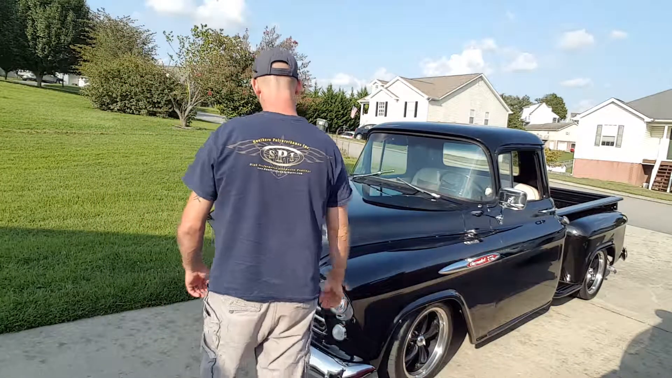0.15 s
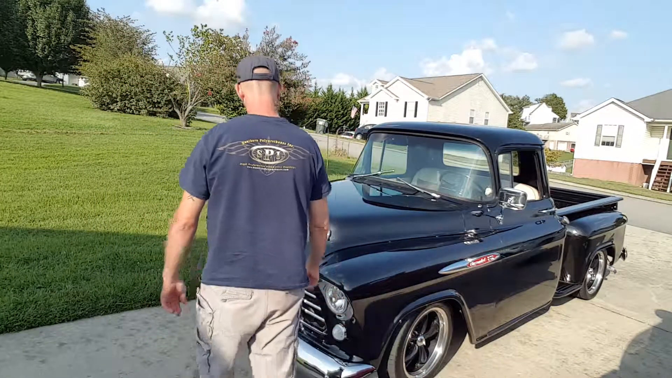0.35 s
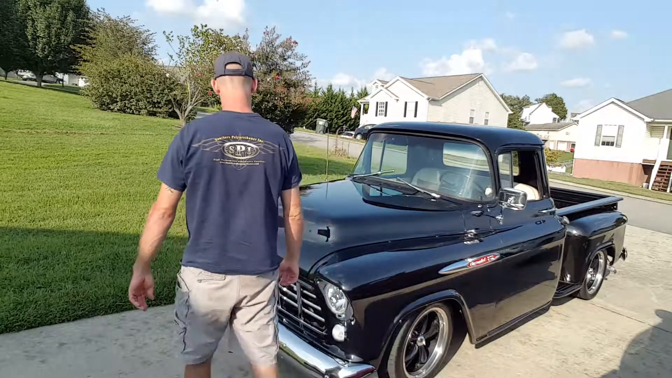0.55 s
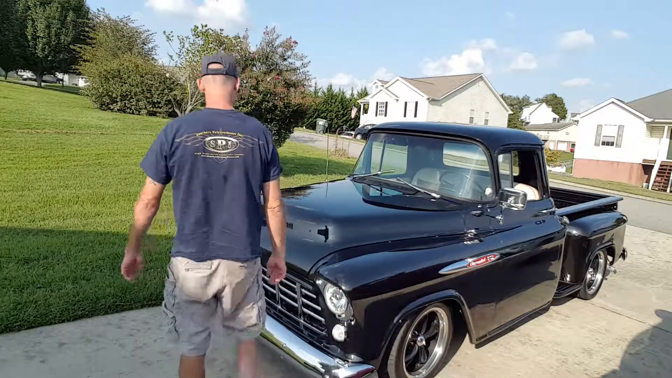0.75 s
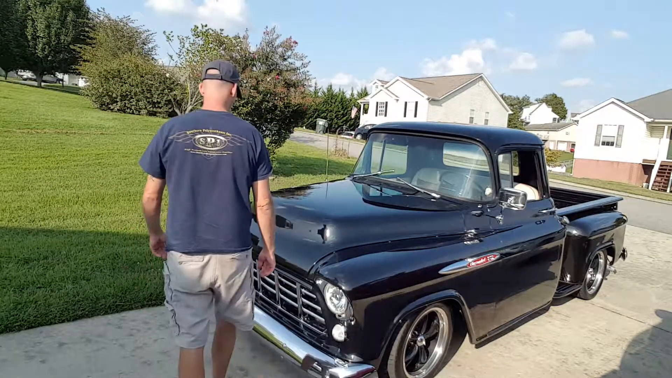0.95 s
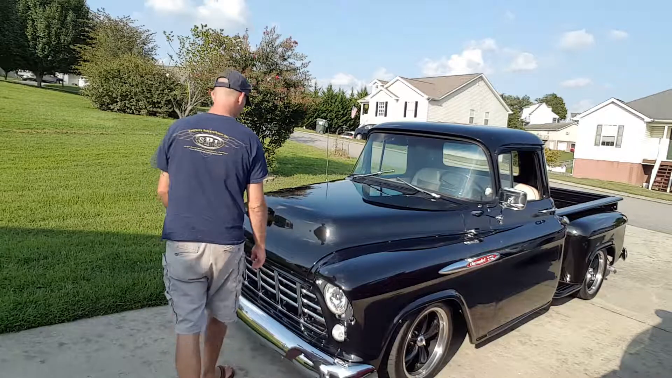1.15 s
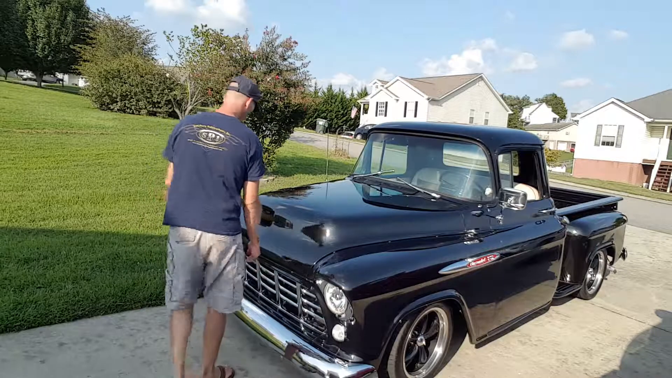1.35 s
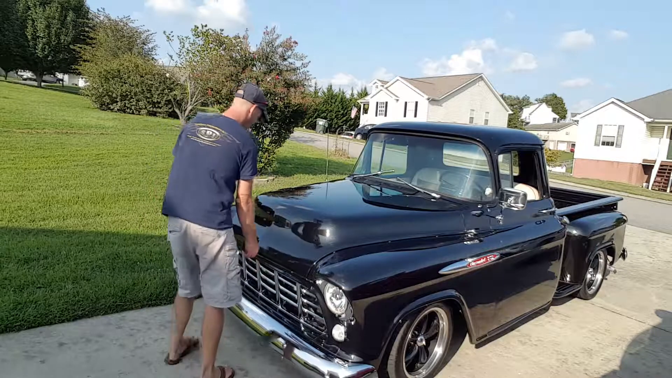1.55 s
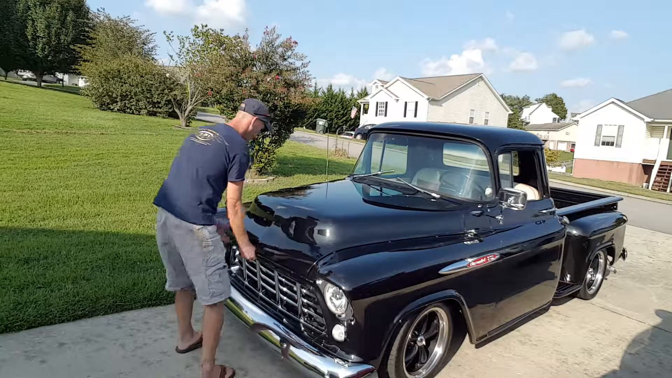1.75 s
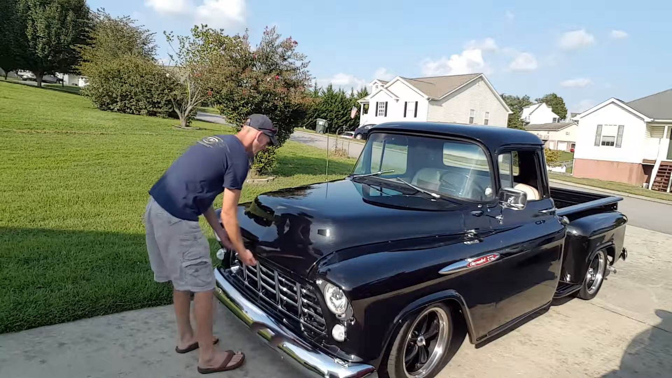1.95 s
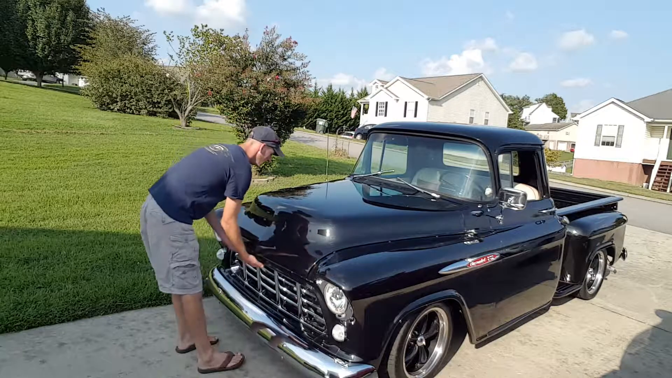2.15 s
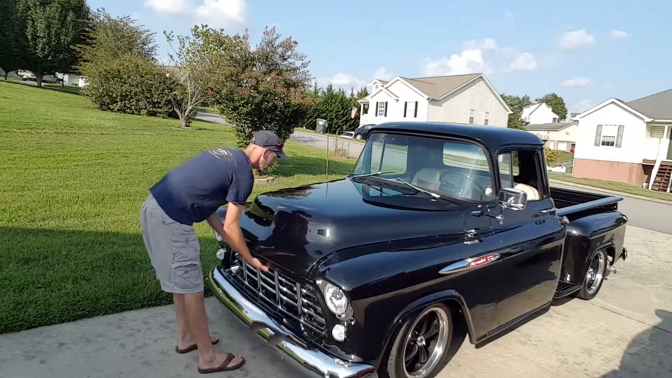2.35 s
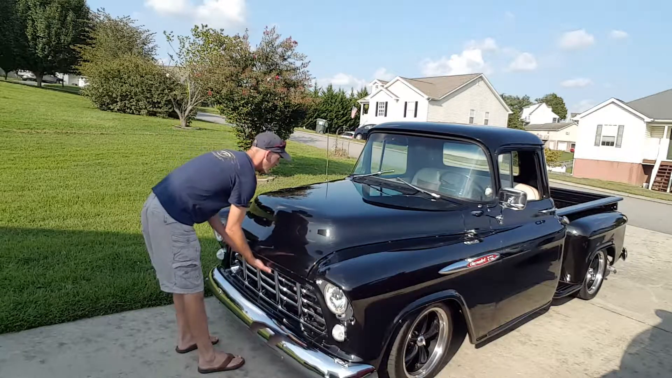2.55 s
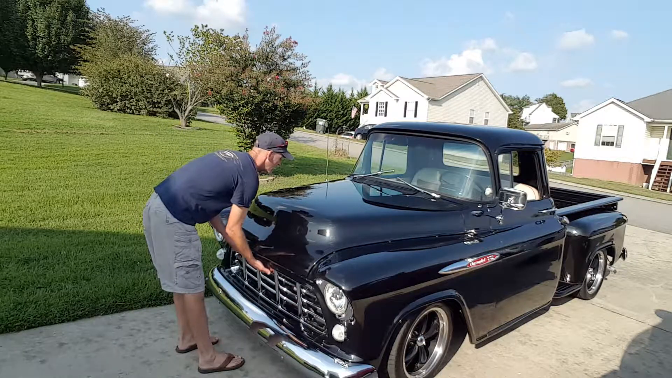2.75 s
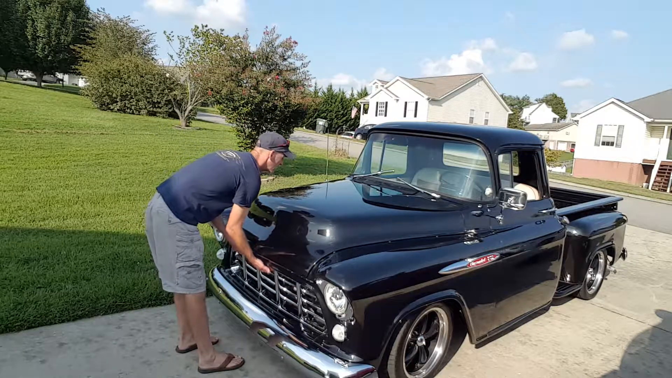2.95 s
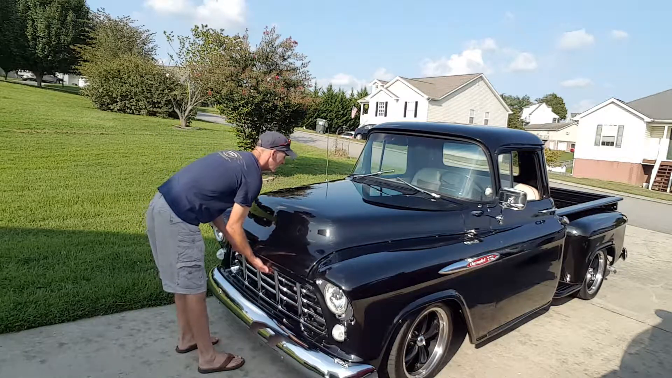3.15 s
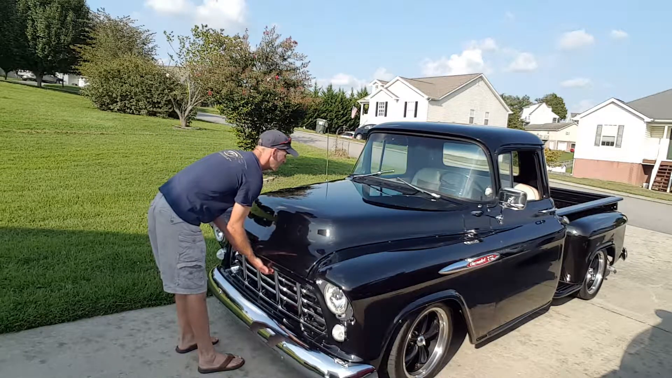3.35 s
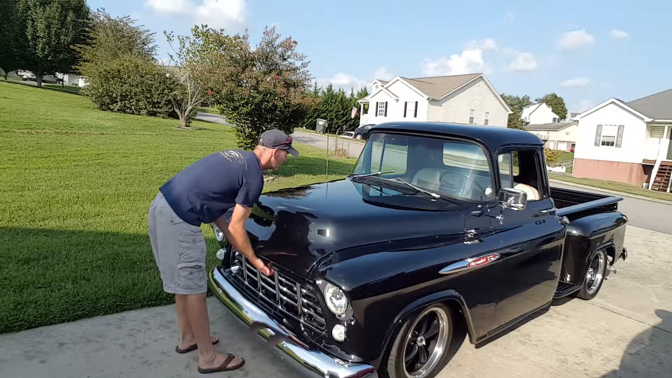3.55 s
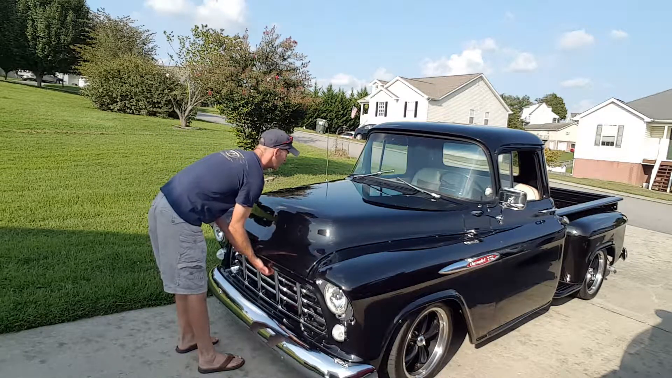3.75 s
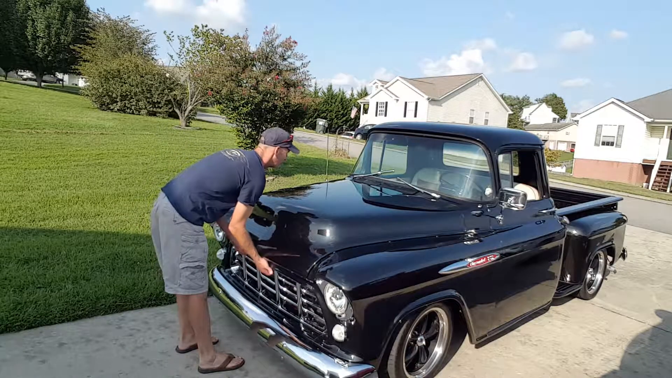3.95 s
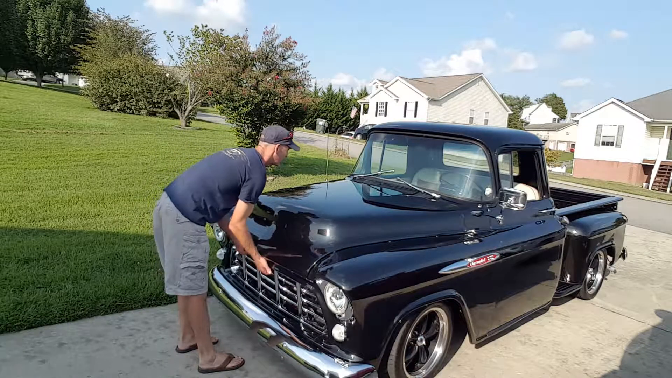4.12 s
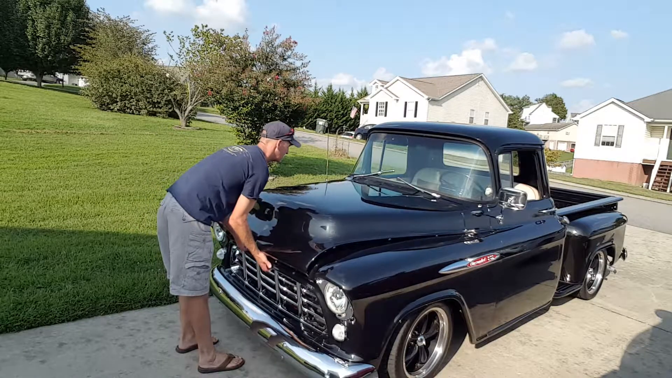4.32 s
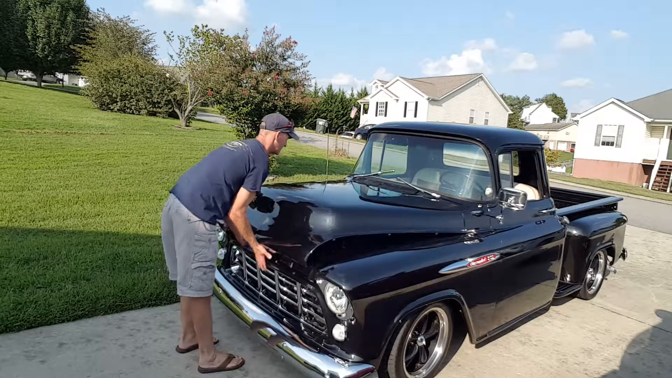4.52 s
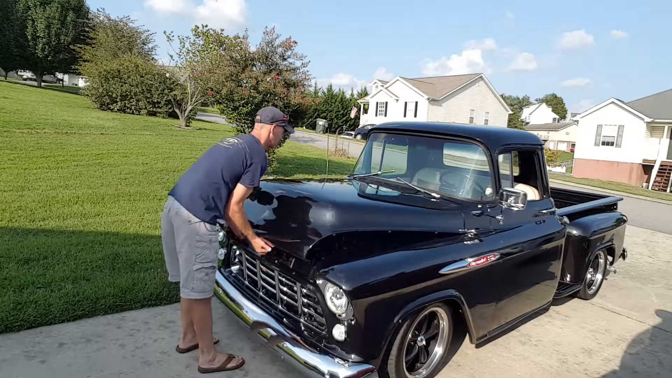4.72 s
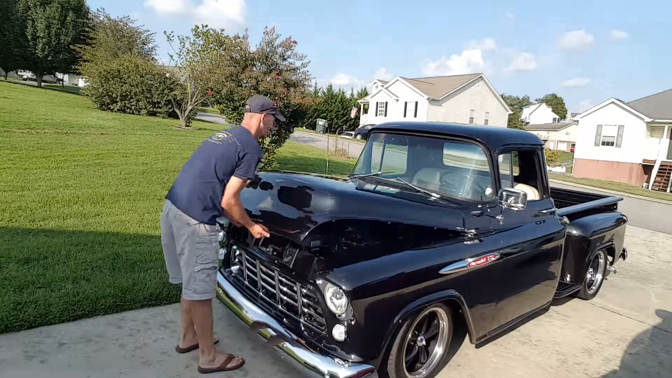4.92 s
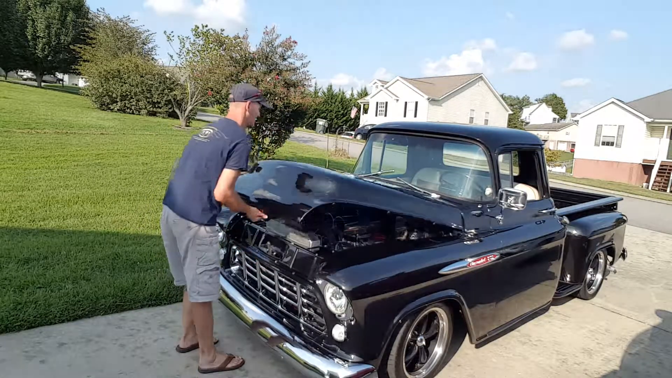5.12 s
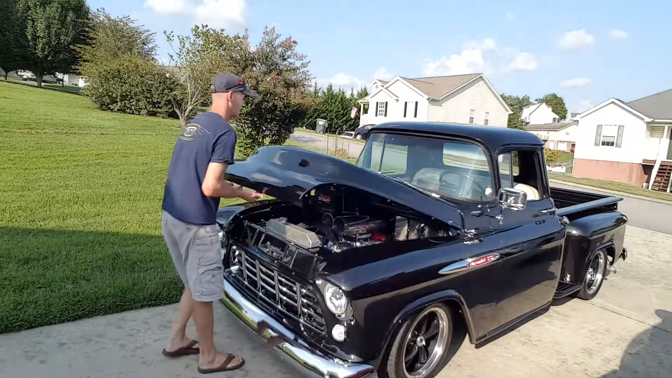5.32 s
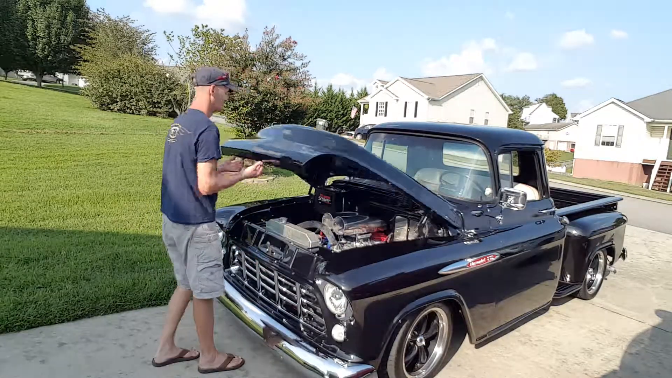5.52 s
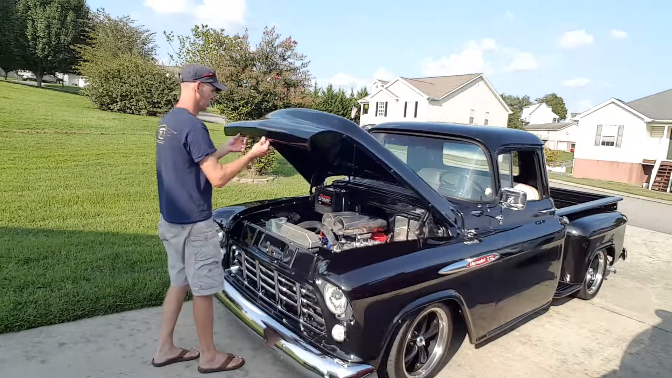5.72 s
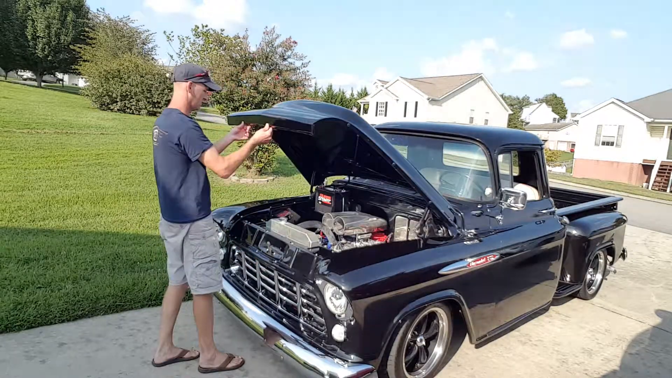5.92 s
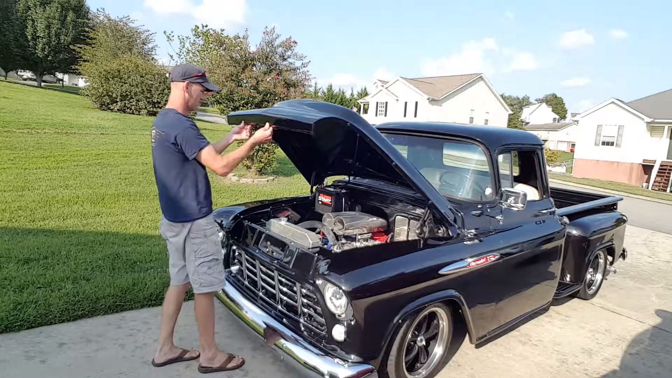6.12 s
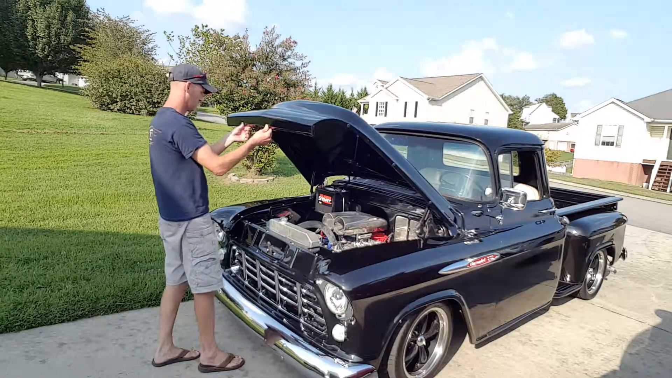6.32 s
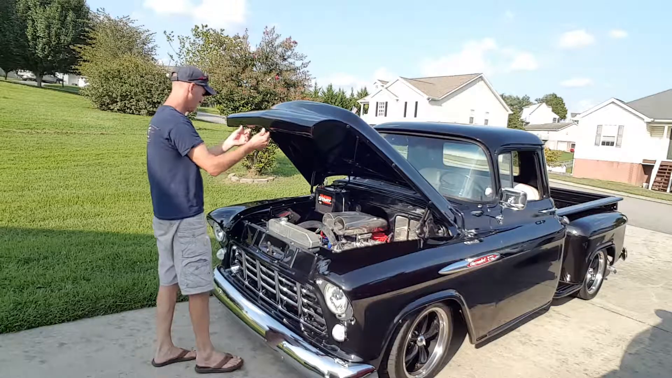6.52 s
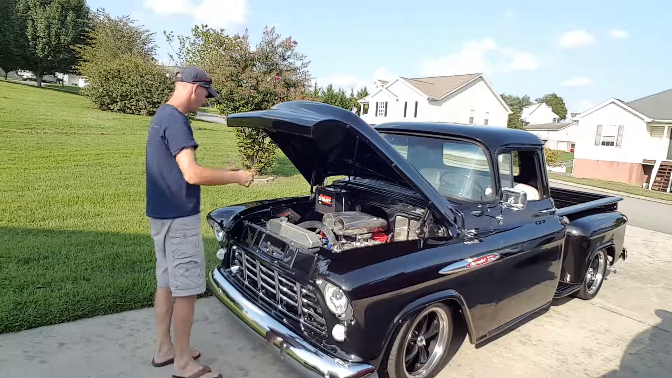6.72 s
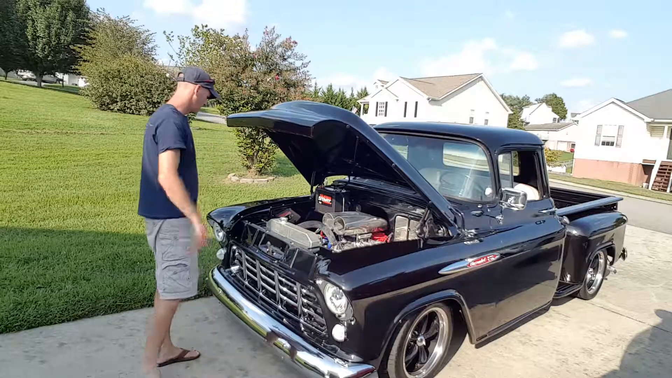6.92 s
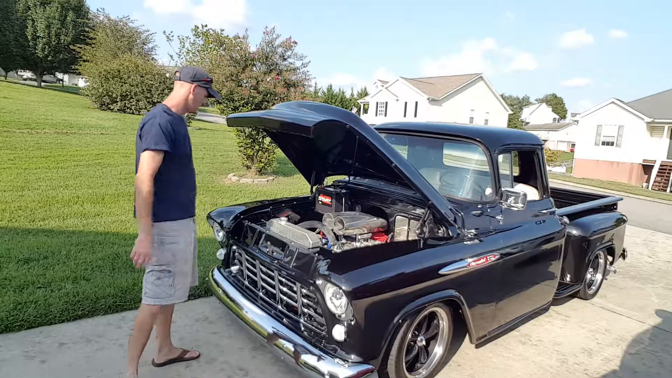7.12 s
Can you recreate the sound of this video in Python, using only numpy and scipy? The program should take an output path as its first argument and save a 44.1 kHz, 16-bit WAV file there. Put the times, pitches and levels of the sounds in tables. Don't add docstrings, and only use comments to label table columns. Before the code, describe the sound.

Sandals scuff on concrete, a latch is fumbled with small knocks, then a steel truck hood pops with loud rattling bangs over quiet suburban hum.

```python
import sys
import numpy as np
from scipy import signal
from scipy.fft import rfft, irfft, next_fast_len
from scipy.io import wavfile
from scipy.ndimage import uniform_filter1d

SR = 44100
rng = np.random.default_rng(int(sys.argv[2]) if len(sys.argv) > 2 else 0)


def bounce(signal):
    frames = np.transpose(np.atleast_2d(signal))
    limited = np.clip(frames, -1, 1)
    pcm = np.round(limited * 32767).astype(np.int16)
    wavfile.write(sys.argv[1], SR, pcm)


def decibels_to_gain(level_db):
    exponent = np.asarray(level_db, float) / 20
    return 10 ** exponent


N = 320518


def read(points, hz):
    f, value = np.transpose(points)
    return np.interp(np.log(hz + 1), np.log(f + 1), value)


def evened(x):
    return x / np.sqrt(np.mean(x ** 2) + 1e-20)


def add(mix, start_s, sound):
    part = mix[:, round(start_s * SR):][:, :sound.shape[-1]]
    part += sound[..., :part.shape[1]]


def colour(x, points):
    n = next_fast_len(x.shape[-1])
    gain = decibels_to_gain(read(points, np.fft.rfftfreq(n, 1 / SR)))
    return irfft(rfft(x, n) * gain, n)[..., :x.shape[-1]]


def resonate(x, hz, width_hz):
    turn = np.exp(2j * np.pi * np.cumsum(hz * np.ones(x.shape[-1])) / SR)
    r = np.exp(-np.pi * width_hz / SR)
    return 2 * (turn * signal.lfilter([1 - r], [1, -r], x / turn)).real


def ports(hz, db, t60_s, length_s, scatter=0.16):
    t = np.arange(round(length_s * SR)) / SR
    start, shift = rng.standard_normal((2, len(hz), 1))
    shift = hz[:, None] / 1000 * (scatter * shift - .29)
    size = decibels_to_gain(db[:, None] - 60 * t / t60_s[:, None])
    turn = 2 * np.pi * hz[:, None] * t + 3 * start
    return np.array([decibels_to_gain(-5.5) * size * np.sin(turn + shift), size * np.sin(turn)]) * 2.53


# (time [s], drum level [dB], hardness [dB], boom [dB rel. drum])
HOOD_KNOCKS = [(2.771, -52.5, -20, 0), (3.241, -38.5, -17, -10), (3.261, -39.5, -21, -10.5),
               (3.595, -47, -6, -17), (3.761, -41, -2.5, 8), (3.769, -37, -2.5, 3.5), (3.819, -53, -6, 18),
               (3.929, -56, -10, 5), (4.199, -46.5, -9.5, -1.5), (4.283, -41, -16, 6),
               (4.352, -33.5, 2.5, 4.5), (4.399, -24, -7, -8.5), (4.403, -16.2, 1.5, -7.5),
               (4.419, -20.5, -8, -12), (4.434, -23, -10, -12), (4.511, -18.5, 5, -14.5),
               (4.523, -15, -1.5, -9), (4.544, -14, -9, -13.5), (4.587, -22.5, -2.5, -18.5),
               (4.627, -18.5, -15.5, -20), (4.66, -33, -3.5, -9.5), (4.759, -37.5, -10, -8.5),
               (4.829, -41, -11, -2.5), (5.05, -39, -30, -4), (5.179, -54, -19, -2.5), (5.248, -60, -4, 7),
               (5.613, -38.5, -23, -10.5), (5.763, -40.5, -22, -8.5)]
# (frequency [Hz], level [dB], t60 [s])
PANEL_MODES = [(241.5, -2.5, 1.1), (290.2, -5, 0.28), (345, -9, .6), (593, -13, .6), (743, -7, 0.45),
               (838, -15, .6), (1052.4, -9, 0.5), (1147, -12, 0.6), (1350, -12, 0.44), (1483, -11, 0.25),
               (1634, -11, 0.2), (2046, -9, 0.25), (2190, -8, 0.3), (2335, -14, 0.28)]
# (frequency [Hz], level [dB per Hz])
SHELL_SPECTRUM = [(30, -40), (55, -11), (92, -2), (150, -7.5), (250, 2), (400, -3), (700, -6),
                  (1000, -11.5), (1600, -13.5), (2200, -17.5), (4000, -25), (12900, -32.5), (16000, -39)]
# (centre [Hz], factor on ring time [1], rise [s], left-right likeness [1])
SHELL_BANDS = [
    (94.7, 3.3, 0.012, 0.96),
    (427, 1.12, 0.0048, 0.99),
    (1600, 1.38, 0.0016, 0.83),
    (6040, 0.64, 0.00083, 0.22),
]


def hood_shell():
    t = np.arange(18000) / SR
    hz = np.fft.rfftfreq(len(t), 1 / SR)
    centre_hz, ring, rise_s, same = np.transpose(SHELL_BANDS)[..., None, None]
    bands = np.array([read(np.c_[centre_hz.ravel(), row], hz) for row in np.eye(len(SHELL_BANDS))])
    bands = bands[:, None] ** 0.9
    shell_gain = bands * decibels_to_gain(read(SHELL_SPECTRUM, hz))
    mode_hz, mode_db, mode_t60_s = np.transpose(PANEL_MODES)
    modes = ports(mode_hz, mode_db, 1.6 * mode_t60_s, len(t) / SR, scatter=0.089)
    fade_out = np.minimum((t[-1] - t) / .05, 1)
    mix, blows = np.zeros((2, N)), np.zeros((1, N))
    for s, drum_db, clang_db, boom_db in HOOD_KNOCKS:
        crack_db = 0.6 + 1.25 * clang_db
        t60_s = .18 - .0015 * (drum_db + 15) - .002 * clang_db
        own, right = rng.standard_normal((2, 1, 1, len(t)))
        left = same * np.roll(right, 2, -1) + np.sqrt(1 - np.minimum(same, 1) ** 2) * own
        dense = np.concatenate([decibels_to_gain(-6.5) * left, right + 0 * left], 1)
        dense = irfft(rfft(dense) * shell_gain, len(t))
        struck = np.einsum("m,cmt->ct", rng.standard_normal(len(PANEL_MODES)), modes)
        lines = irfft(rfft(struck) * bands, len(t))
        parts = dense / dense.std((1, 2), keepdims=True) + 0.27 * lines / lines[1].std()
        rattle = decibels_to_gain(3.2 * evened(uniform_filter1d(rng.standard_normal(len(t)), 200)))
        level_db = drum_db + np.array([boom_db, 0, clang_db, crack_db])[:, None, None]
        decay = decibels_to_gain(level_db - 11.3 - 60 * t / (t60_s * ring))
        softness_db = max(-clang_db, 0)
        rise = np.minimum(t / rise_s / (1 + .09 * softness_db), 1)
        shape = decay * rise * rattle ** (centre_hz > 300)
        add(mix, s, (parts * shape).sum(0) * fade_out)
        if drum_db > -30:
            add(blows, s, decibels_to_gain(drum_db) * own[0, :, :300] / np.sqrt(300))
    return mix, blows


# (frequency [Hz], level [dB], t60 [s])
FREE_MODES = [(96, -10, 0.69), (243, -11, 0.55), (293.9, -8, 0.47), (641, -23, .8), (723, -24, .7),
              (892, -20.5, .4), (1050, -17.5, .45), (1420, -23.5, 0.36), (205, -17, 0.8), (2013, -26, .6),
              (1545, -27, .6), (2400, -30, .5), (2930, -27, .5), (3320, -42, 0.6)]


def free_panels(blows):
    hz, db, t60_s = np.transpose(FREE_MODES)
    ring = ports(hz, db, np.minimum(t60_s, .9), 1.0).sum(1)
    ring *= np.minimum(np.arange(SR) / 900, 1)
    return decibels_to_gain(-15) * signal.fftconvolve(blows, ring, axes=1)[:, :N]


def hood():
    shell, blows = hood_shell()
    return shell + free_panels(blows)


# (start [s], end [s], frequency
# [Hz], width [Hz], level [dB])
LATCH_CREAKS = [(4.195, 4.265, 5530, 40, -48), (4.197, 4.26, 11080, 110, -63),
                (4.038, 4.105, 480, 90, -61.5), (4.115, 4.19, 482, 67, -61),
                (4.189, 4.252, 662, 90.4, -59.5), (4.19, 4.335, 91, 30, -46),
                (4.262, 4.335, 1100, 140, -54), (5.05, 5.09, 560, 200, -56),
                (4.257, 4.315, 1690, 60, -58.5), (4.252, 4.35, 658, 110, -57),
                (4.353, 4.388, 1032, 200, -39.5), (4.353, 4.386, 1632, 200, -44),
                (4.392, 4.407, 440, 330, -31)]


def latch():
    mix = np.zeros((2, N))
    for (s, end_s, hz, width_hz, db), slips in zip(LATCH_CREAKS, rng.standard_normal((len(LATCH_CREAKS), 8000))):
        groan = evened(resonate(resonate(slips, hz, width_hz), hz, 3 * width_hz))
        groan = groan[1000:1000 + round((end_s - s) * SR)]
        swell = signal.windows.tukey(len(groan), .5)
        add(mix, s, decibels_to_gain(db) * groan * swell * decibels_to_gain([[-3.0], [2.5]]))
    return mix


# (time [s], modes as (frequency [Hz], level [dB], t60 [s]))
SPRING_PINGS = [
    (3.763, [(9030, -62, .1), (11800, -63, 0.13), (3340, -67, 0.23), (1100, -51, .22), (1350, -53, .1), (2200, -55, .12), (14600, -69, .08)]),
    (3.928, [(8460, -34.5, 0.11), (8670, -52, 0.15), (8700, -54, .1)]),
    (4.252, [(5520, -61, .24), (5590, -69, .15)]),
]


def springs():
    mix = np.zeros((2, N))
    for s, modes in SPRING_PINGS:
        ring = ports(*np.transpose(modes), 0.417, scatter=0.064).sum(1)
        add(mix, s, ring * np.minimum(np.arange(ring.shape[1]) / 130, 1))
    return mix


# (frequency [Hz], level [dB per Hz])
GRIT_SPECTRUM = [(180, -45), (300, -13), (392, -11), (555, -4), (667, -5), (1560, -10.5), (4300, -9),
                 (4830, -17), (12900, -21.5), (16000, -43.5)]
# (start [s], length [s], level [dB], hiss [dB rel.], sole resonance [Hz])
SOLE_DRAGS = [
    (.15, .09, -72, -18, 1600),
    (.565, .065, -66, -6, 2300),
    (1.053, .098, -50.5, -6, 1250),
    (1.641, .082, -48, -4, 1750),
    (1.825, .045, -65, -3, 2080),
    (5.235, .05, -70, -18, 1600),
    (6.7, .16, -69.5, -1.5, 1620),
]
# (attack [s], swell [dB], release t60 [s], share of sole resonance [1])
DRAG_SHAPE = (.005, 3., .045, 1.5)
# (start [s], length [s], level [dB], hiss [dB rel.], resonance [Hz])
QUICK_BRUSHES = [
    (0.0, .012, -58, -6, 1400),
    (1.985, .06, -58, -6, 1500),
    (3.255, .03, -60, -15, 1650),
    (3.586, .04, -59.5, -18, 1350),
    (4.256, .04, -59, -6, 1140),
    (5.438, .058, -56.5, -1.5, 1500),
    (5.112, .022, -59, 2.5, 1620),
    (5.738, .024, -58, 2.5, 1700),
]
# (attack [s], swell [dB], release t60 [s], share of sole resonance [1])
BRUSH_SHAPE = (.009, -5., .05, .35)


def scuffs():
    mix = np.zeros((2, N))
    t = np.arange(9000) / SR
    low_pass = signal.butter(2, 3200, fs=SR, output="sos")
    high_pass = signal.butter(2, 3800, "high", fs=SR, output="sos")
    for rows, (attack_s, swell_db, release_s, share) in ((SOLE_DRAGS, DRAG_SHAPE), (QUICK_BRUSHES, BRUSH_SHAPE)):
        for (s, length_s, level_db, hiss_db, hz), noise in zip(rows, rng.standard_normal((len(rows), 3, 9000))):
            press_db = swell_db * (np.minimum(t / length_s, 1) - .5)
            press_db -= 60 * np.maximum(t - length_s, 0) / release_s
            grains = noise[:2] * decibels_to_gain(2.15 * rng.exponential(1, len(t)))
            grains *= decibels_to_gain(2.8 * evened(uniform_filter1d(noise[2], 160, mode="wrap")))
            grit = colour(grains, GRIT_SPECTRUM)
            low = signal.sosfilt(low_pass, grit)
            low = np.array([0.49 * low[1] + .5 * low[0], low[1]])
            body = evened(resonate(low, hz, 300) + .9 * resonate(low, 1880, 200))
            sole = (evened(low) + share * body) / np.sqrt(1 + share ** 2)
            hiss = decibels_to_gain(hiss_db) * evened(signal.sosfilt(high_pass, grit))
            scrape = (sole + hiss) * decibels_to_gain(level_db + press_db)
            add(mix, s, scrape * np.minimum(t / attack_s, 1) * decibels_to_gain([[-1.5], [1.5]]))
    return mix


# (time [s], peak [dB], ring [Hz], snap [dB rel.], t60 [s])
SANDAL_TICKS = [(.493, -51, 1700, -10, 0.0074), (.734, -43.5, 1510, -10, 0.013),
                (1.242, -49, 1900, -4, .01), (1.281, -51, 1260, -8, 0.014),
                (1.3737, -29.5, 890, -13.5, 0.0047), (1.988, -42, 437, -25, 0.033),
                (4.281, -47, 2300, 1.5, 0.0065), (5.478, -46, 1000, -8, 0.011),
                (5.51, -27.5, 885, -38, 0.008), (5.544, -41, 700, -14, 0.008), (5.555, -48, 1110, -9, .008),
                (5.85, -60, 2500, 3, .01), (6.708, -56, 2060, -5.5, .009), (6.735, -56, 1380, -4, .01),
                (6.81, -60, 1820, -5, .01)]


def slaps():
    mix = np.zeros((2, N))
    t = np.arange(1500) / SR
    for (s, db, hz, snap_db, t60_s), noise in zip(SANDAL_TICKS, rng.standard_normal((len(SANDAL_TICKS), 2, 1500))):
        ring = -np.sin(2 * np.pi * hz * t) - 0.1 * np.sin(2 * np.pi * hz * 1.98 * t)
        ring = ring * np.minimum(t * hz / .33, 1) + decibels_to_gain(snap_db) * noise
        ring = ring * decibels_to_gain(db - 60 * t / t60_s)
        ring[:, 76:] += 0.87 * ring[:, :-76]
        add(mix, s, ring * decibels_to_gain([[-3], [3]]))
    return mix


# (time [s], peak [dB], frequency [Hz])
HEEL_THUMPS = [
    (0.009, -45, 70.0),
    (1.797, -46.5, 91.5),
    (2.175, -51, 125),
    (2.776, -48, 79),
]


def heels():
    mix = np.zeros((2, N))
    t = np.arange(2500) / SR
    swell = t / 0.0072 * np.exp(1 - t / 0.0059)
    for s, db, hz in HEEL_THUMPS:
        thump = decibels_to_gain(db) * np.sin(2 * np.pi * hz * t) * swell
        add(mix, max(s - .006, 0), thump * decibels_to_gain([[-2.5], [2.0]]))
    return mix


def yard(x):
    t = np.arange(12000) / SR
    taps = rng.choice([-1., 1.], (2, len(t))) * (rng.random((2, len(t))) < .045)
    taps = taps * decibels_to_gain(-60 * t / 0.4) * (t > .006)
    taps = colour(taps, [(100, -16.5), (400, -5.5), (1500, -3.5), (4000, 1.5), (16000, -11)])
    return decibels_to_gain(-12) * signal.fftconvolve(x, taps / np.linalg.norm(taps[0]), axes=1)[:, :N]


# (start [s], fade-in [s], end [s], level [dB])
KATYDID_BOUTS = [
    (-.1, .45, 2.43, -73.5),
    (4.7, 1.2, 7.4, -74.5),
]
# (frequency [Hz], level [dB])
KATYDID_SPECTRUM = [(10000, -29.5), (12000, -10.5), (14000, 0), (15300, -1), (16200, -10)]


def katydid():
    t = np.arange(N) / SR
    beat = 37.1 * t + .15 * np.sin(2 * np.pi * .4 * t)
    pulses = .3 + np.exp(-(beat % 1) / .35) + .15 * np.exp(-((beat + .5) % 1) / 0.17)
    bouts = 0
    for s, rise_s, end_s, db in KATYDID_BOUTS:
        bouts = bouts + decibels_to_gain(db) * np.clip(np.minimum((t - s) / rise_s, (end_s - t) / .05), 0, 1)
    rasp = evened(colour(rng.standard_normal((2, N)) * pulses, KATYDID_SPECTRUM))
    return rasp * bouts * decibels_to_gain([[1.2], [-1.2]])


def crickets():
    t = np.arange(N) / SR
    flutter = decibels_to_gain(2.1 * evened(uniform_filter1d(rng.standard_normal(N), 600)))
    band = resonate(resonate(rng.standard_normal((2, N)), 7400, 850), 7400, 850)
    level_db = -79 + 2.4 * np.cos(2 * np.pi * t / 2.4)
    return evened(band * flutter) * decibels_to_gain(level_db) * decibels_to_gain([[-2.0], [2.0]])


# (start [s], length [s], pitch [Hz], level [dB], third partial [dB rel.])
FAR_SQUEAKS = [
    (.15, .17, 685, -79, 4),
    (.36, .1, 678, -71.5, -12),
]


def far_squeal():
    t = np.arange(N) / SR
    squeal = 0
    for s, length_s, hz, db, third_db in FAR_SQUEAKS:
        arch = np.sin(np.pi * np.clip((t - s) / length_s, 0, 1))
        glide_hz = hz * (1 - .05 * np.exp(-np.maximum(t - s, 0) / .025))
        turn = 2 * np.pi * np.cumsum(glide_hz) / SR
        partials = np.sin(2 * turn) + decibels_to_gain(third_db) * np.sin(3 * turn) + np.sin(4 * turn)
        squeal = squeal + decibels_to_gain(db) * arch * partials
    return squeal


# (frequency [Hz], width [Hz], level [dB])
HUM_LINES = [
    (58, 5.6, -65.5),
    (118.7, 3.7, -64.5),
    (176, 4.9, -75.5),
]


def air_conditioner():
    hum = sum(decibels_to_gain(db) * evened(resonate(rng.standard_normal(N), hz, width_hz)) for hz, width_hz, db in HUM_LINES)
    return hum * decibels_to_gain([[-2.5], [2.0]])


# (frequency [Hz], level [dB per Hz])
FAR_SPECTRUM = [(15, -54.5), (25, -22), (59, -10), (87, -14.5), (120, -4), (149, -21.5), (229, -16.5),
                (330, -22), (560, -22.5), (1370, -27.5), (2500, -31.5), (3700, -39), (6050, -44),
                (7110, -42), (10100, -44), (16000, -42.5)]
# (frequency [Hz], left-right likeness [1])
FAR_LIKENESS = [(60, 0.059), (240, 0.51), (950, -0.28), (3770, 0.2), (15000, -0.47)]
# (frequency [Hz], left-right difference [dB])
FAR_LEAN = [(60, -7), (180, -0.5), (550, -0.5), (1650, -3), (4970, -3.5), (15000, -1.5)]


def traffic():
    frames, hz = N // 512 + 5, np.fft.rfftfreq(2048, 1 / SR)
    a, b, c, d, patches = rng.standard_normal((frames, 1025, 5)).T
    patches = evened(uniform_filter1d(uniform_filter1d(patches, 16, 0), 8, 1))
    same = np.clip(read(FAR_LIKENESS, hz), -1, 1)[:, None]
    left = a + 1j * b
    right = same * left + np.sqrt(1 - same ** 2) * (c + 1j * d)
    lean_db = np.outer([.5, -.5], read(FAR_LEAN, hz))[..., None]
    z = np.array([left, right]) * decibels_to_gain(read(FAR_SPECTRUM, hz)[:, None] + 1.4 * patches + lean_db)
    return decibels_to_gain(-60) * evened(signal.istft(z, nperseg=2048, noverlap=1536)[1][:, :N])


def scene():
    near = hood() + latch() + springs() + scuffs() + slaps() + heels()
    return near + yard(near) + katydid() + crickets() + far_squeal() + air_conditioner() + traffic()


def band_limit(x):
    return signal.sosfilt(signal.butter(12, 16850, fs=SR, output="sos"), x)


def record(dry):
    limited = 0.66 * np.tanh(dry / 0.64)
    edged = colour(limited, [(20, -16), (40, 1.5), (15750, 0.5), (15950, -22), (20000, -32)])
    return band_limit(edged)


dry = scene()
out = record(dry)
bounce(out)
```